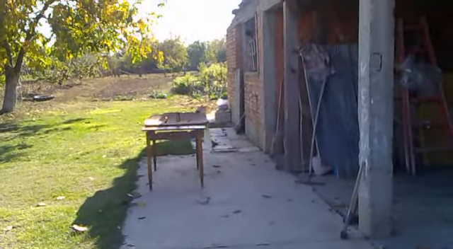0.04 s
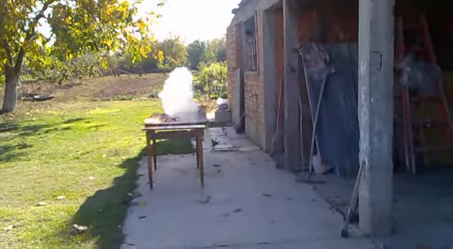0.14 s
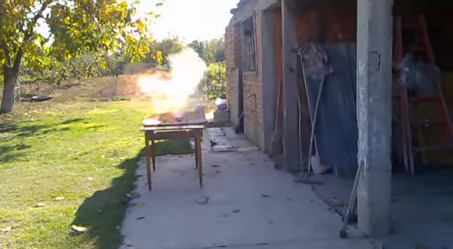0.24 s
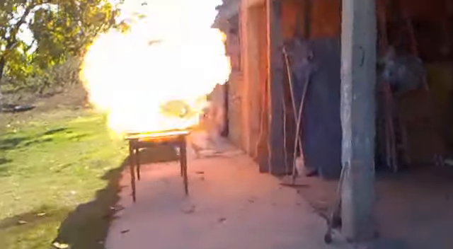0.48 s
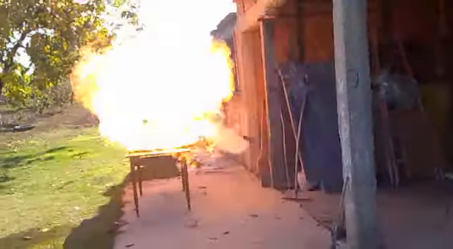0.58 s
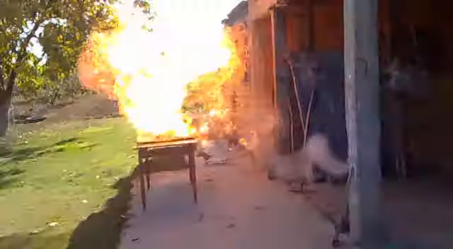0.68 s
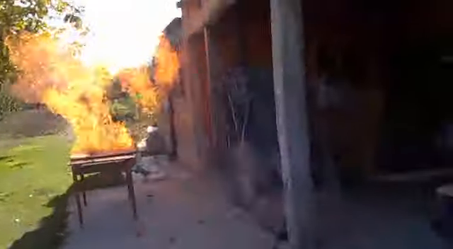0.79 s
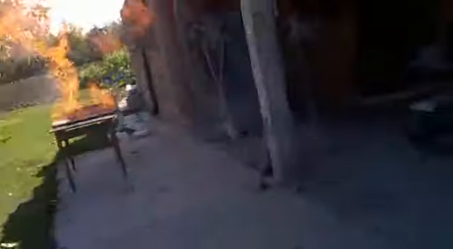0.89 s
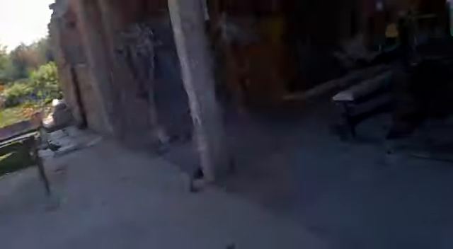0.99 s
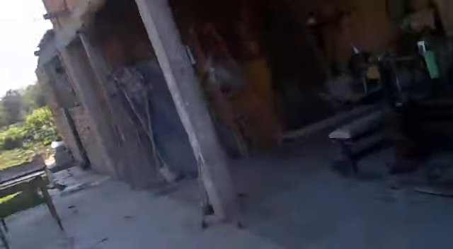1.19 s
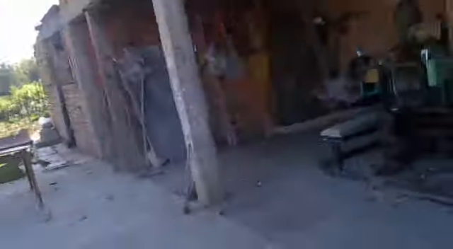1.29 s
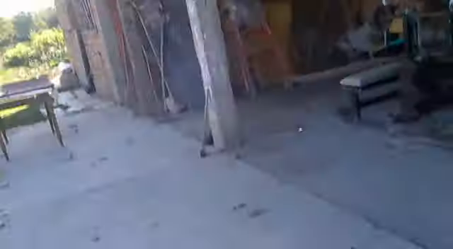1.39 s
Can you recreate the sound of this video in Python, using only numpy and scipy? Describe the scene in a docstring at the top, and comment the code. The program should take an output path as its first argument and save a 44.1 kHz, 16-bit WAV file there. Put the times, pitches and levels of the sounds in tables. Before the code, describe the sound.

A fireball erupts outdoors, starting with a hissing spit of fuel at about 0.2 seconds and a blast at 0.3. From 0.4 the flame roars, crackles and rumbles loudly with low thumps, flaring once more at 0.9 before dying down. At about 1.1 seconds a small, sharp knock echoes briefly around the yard, and soft microphone handling bumps follow until about 1.4.

```python
"""Pressurised fuel bursts into a fireball on a table outdoors, beside a shed.
After a faint tick, fuel spits out in a hissing jet and a second blast follows. The turbulent flame
roars, crackles and rumbles, with gliding resonances, brief rings and low thumps, then flares once more.
As it dies, something knocks, the yard echoes, and the moving microphone picks up soft thumps."""
import sys
import numpy as np
from scipy import signal
from scipy.fft import rfft, irfft
from scipy.io import wavfile
from scipy.ndimage import uniform_filter1d

SR = 44100
rng = np.random.default_rng(int(sys.argv[2]) if len(sys.argv) > 2 else 0)


def bounce(signal):
    """Save signal as a 16-bit WAV file at the path given by the first command-line argument."""
    frames = np.transpose(np.atleast_2d(signal))
    limited = np.clip(frames, -1, 1)
    pcm = np.round(limited * 32767).astype(np.int16)
    wavfile.write(sys.argv[1], SR, pcm)


N = 63945
T = np.arange(N) / SR
BIN_HZ = np.arange(N // 2 + 1) * SR / N


def from_db(db):
    """Decibels to gain."""
    return 10 ** (np.asarray(db) / 20)


def unit_rms(x):
    """Scale to unit power."""
    return x / np.sqrt(np.mean(x ** 2) + 1e-20)


def gain_curve(rows):
    """Gain along (time_s, level_db) points; silent before the first."""
    time_s, level_db = np.transpose(rows)
    return from_db(np.interp(T, time_s, level_db, left=-120))


def envelope(start_s, attack_s, hold_s, fall_db_per_s):
    """Linear rise, hold, exponential fall."""
    rise = np.clip((T - start_s) / attack_s, 0, 1)
    return rise * from_db(-fall_db_per_s * np.maximum(T - start_s - attack_s - hold_s, 0))


def at_hz(rows, hz, column=1):
    """Interpolate a table column over log frequency."""
    rows = np.array(rows)
    return np.interp(np.log(hz + 1), np.log(rows[:, 0]), rows[:, column])


def colour(x, spectrum):
    """Filter by (freq_hz, gain_db) points, rolled off past both ends; unit power."""
    low_skirt = np.minimum(BIN_HZ / spectrum[0][0], 1) ** 2
    high_skirt = np.minimum(spectrum[-1][0] / (BIN_HZ + 1), 1) ** 2
    return unit_rms(irfft(rfft(x) * from_db(at_hz(spectrum, BIN_HZ)) * low_skirt * high_skirt, N))


def steady(x, samples):
    """Level the power over a sliding window."""
    power = uniform_filter1d(uniform_filter1d(x * x, samples), samples)
    return x / np.sqrt(power + 1e-12)


def drift(cutoff_hz):
    """Low-passed noise, unit power."""
    lowpass = signal.butter(2, cutoff_hz, fs=SR, output="sos")
    return unit_rms(signal.sosfilt(lowpass, rng.standard_normal(N)))


def damped_sine(start_s, pitch_hz, t60_s):
    """One struck mode."""
    age_s = np.maximum(T - start_s, 0)
    return np.sin(2 * np.pi * pitch_hz * age_s) * np.exp(-np.log(1000) * age_s / t60_s)


# Flame band levels: time_s, level_db
RUMBLE_LEVEL = [(.22, -41), (.39, -43), (.43, -11.5), (.5, -17.5), (.56, -22.5), (.64, -21.5),
                (.685, -18.5), (.74, -16.5), (.78, -13.5), (.85, -10.5), (.92, -22.5), (1.03, -31),
                (1.12, -43), (1.2, -43.5), (1.27, -36), (1.32, -49), (1.45, -56)]
ROAR_LEVEL = [(.398, -41), (.422, -16), (.47, -13.5), (.51, -22), (.56, -19.5), (.62, -23), (.68, -22.5),
              (.73, -20), (.78, -15.5), (.84, -21), (.89, -21.5), (.95, -28.5), (1.03, -35.5), (1.1, -41.5),
              (1.25, -46), (1.45, -58)]
RASP_LEVEL = [(.38, -48), (.42, -26.5), (.56, -21.5), (.578, -14.5), (.615, -17.5), (.64, -20.5),
              (.71, -22.5), (.77, -27), (.89, -27), (.94, -38), (.99, -33), (1.08, -35), (1.25, -68)]
HISS_LEVEL = [(.36, -29.5), (.423, -26.5), (.434, -35), (.48, -30), (.56, -29), (.6, -23.5), (.66, -28),
              (.705, -25), (.79, -30.5), (.84, -26), (.88, -31), (1.03, -33), (1.08, -44), (1.16, -57),
              (1.225, -45.5), (1.31, -66)]
# Flame band spectra: freq_hz, gain_db
RUMBLE_SPECTRUM = [(18, -3), (32, -12), (48, 9.5), (68, -6.5), (92, 6.5), (122, -14.5), (152, -1.5),
                   (210, -9), (400, -19)]
ROAR_SPECTRUM = [(90, -1.5), (155, 4), (240, 1.5), (320, 4.5), (430, -1), (580, -9.5), (800, -5.5),
                 (1500, -15)]
RASP_SPECTRUM = [(700, -5), (1150, -4), (1500, -4.5), (1800, 3), (2250, -3), (2850, -3), (3250, -5.5),
                 (4200, -8), (6500, -37)]


def fireball():
    """Burning fuel: low rumble under turbulent roar and rasp, hiss on top."""
    rumble = gain_curve(RUMBLE_LEVEL) * steady(colour(rng.standard_normal(N), RUMBLE_SPECTRUM), 1500)
    roar = gain_curve(ROAR_LEVEL) * turbulence(ROAR_SPECTRUM)
    rasp = gain_curve(RASP_LEVEL) * turbulence(RASP_SPECTRUM)
    return rumble + roar + rasp + gain_curve(HISS_LEVEL) * hiss()


# Flame hiss: freq_hz, gain_db
HISS_SPECTRUM = [(2800, 3), (4300, -2), (6000, 2), (8000, -1.5), (10500, -0.5), (13000, -6), (16000, -15)]


def hiss():
    """Smooth, bright rush without shocks or flutter."""
    return steady(colour(rng.standard_normal(N), HISS_SPECTRUM), samples=200)


def turbulence(spectrum, shocks_per_s=1900, shock_share=0.33, spread_db=2.5, flutter_db=1.35):
    """Rushing gas: noise plus dense small shocks, with a fast flutter."""
    impulses = (rng.random(N) < shocks_per_s / SR) * rng.choice([-1, 1], N)
    shocks = impulses * from_db(spread_db * np.minimum(rng.exponential(1, N), 4))
    gas = np.sqrt(shock_share) * unit_rms(shocks) + np.sqrt(1 - shock_share) * rng.standard_normal(N)
    flutter = from_db(flutter_db * drift(cutoff_hz=102))
    return steady(colour(shed_reflections(gas), spectrum), samples=600) * flutter


# Escaping fuel: freq_hz, gain_db
JET_SPECTRUM = [(170, -4.5), (340, 5), (560, 1), (1400, 1.5), (2000, 5), (3000, -8.5), (4200, -14.5),
                (6200, -9), (8000, -16), (10000, -23), (13000, -26), (16000, -39)]
BLAST_SPECTRUM = [(60, -42), (170, -3.5), (330, -0.5), (520, -5), (800, 2), (1400, -0.5), (2000, 0.5),
                  (2900, -5.5), (4200, -11.5), (7000, -18), (11000, -19.5), (16000, -33)]
JET_S, BLAST_S = 0.2255, 0.2952


def burst():
    """Pressure release: a bright jet, then a fuller second blast."""
    jet = envelope(JET_S, attack_s=0.008, hold_s=0.025, fall_db_per_s=115) * limiter_dip()
    blast = envelope(BLAST_S, attack_s=0.00043, hold_s=0.069, fall_db_per_s=128)
    return from_db(-12) * (jet * turbulence(JET_SPECTRUM) + blast * turbulence(BLAST_SPECTRUM))


def limiter_dip(depth_db=-19, width_s=0.0024):
    """The level ducks briefly, as from a limiter, at the second blast's onset."""
    return from_db(depth_db * np.exp(-((T - BLAST_S) / width_s) ** 2))


# Fuel spit: freq_hz, gain_db
SPIT_SPECTRUM = [(3500, -31), (6300, -8), (8000, -1), (10500, 1.5), (13000, -14)]


def tick_and_spit():
    """A faint tick, then the bright spit of escaping fuel."""
    tick = envelope(start_s=0.1445, attack_s=0.001, hold_s=0.001, fall_db_per_s=1500) * hiss()
    spit = envelope(JET_S, attack_s=0.006, hold_s=0, fall_db_per_s=206) * turbulence(SPIT_SPECTRUM)
    return from_db(-57.5) * tick + from_db(-19) * spit * limiter_dip()


# Last flare: freq_hz, gain_db
FLARE_SPECTRUM = [(500, -1.5), (850, -3), (1200, 3.5), (1550, -3), (2050, -0.5), (2800, -4.5),
                  (4200, -16.5), (6200, -22), (9000, -42)]


def flare():
    """One last rush before the flame collapses."""
    shape = envelope(start_s=0.893, attack_s=0.014, hold_s=0.027, fall_db_per_s=161)
    return from_db(-19.5) * shape * turbulence(FLARE_SPECTRUM)


# Flame resonances: time_s, pitch_hz, level_db
HOLLOW_GLIDE = [(.41, 760, -28.5), (.475, 870, -18), (.51, 900, -24), (.55, 781, -19), (.61, 850, -32),
                (.675, 820, -15), (.71, 920, -20), (.78, 850, -26)]
WHISTLE_GLIDE = [(.42, 2623, -29), (.455, 2657, -22.5), (.51, 2783, -26.5), (.56, 2726, -26),
                 (.597, 2735, -17), (.63, 2603, -22), (.695, 2490, -27), (.714, 2514, -21.5)]


def resonance(glide, width_hz, fall_db_per_s=500):
    """The flame sings: narrow noise on a gliding pitch, dying after the last point."""
    time_s, pitch_hz, level_db = np.transpose(glide)
    phase = 2 * np.pi * np.cumsum(np.interp(T, time_s, pitch_hz)) / SR
    band = drift(width_hz / 2) * np.cos(phase) + drift(width_hz / 2) * np.sin(phase)
    release_db = fall_db_per_s * np.maximum(T - time_s[-1], 0)
    return from_db(np.interp(T, time_s, level_db, left=-120) - release_db) * steady(band, samples=1000)


# Dull pops: centre_s, level_db
POPS = [(0.545, -11), (0.984, -22), (1.257, -29.5)]
# Pop spectrum: freq_hz, gain_db
POP_SPECTRUM = [(150, -2), (450, -4), (900, -12.5)]


def pops(width_s=0.0048):
    """Dull pops: two in the flame's roar, then a soft microphone-handling bump."""
    pulses = sum(from_db(db) * np.exp(-((T - centre_s) / width_s) ** 2) for centre_s, db in POPS)
    return pulses * steady(turbulence(POP_SPECTRUM), samples=150)


# Rings in the blaze: start_s, pitch_hz, level_db, attack_s, t60_s
RINGS = [(.2955, 1630, -4, 0.00073, 0.0067), (0.566, 1720, -6, 0.0075, 0.032),
         (0.9033, 2015, -6.5, 0.0013, 0.015)]


def rings(wander=0.005):
    """Brief ringing tones of unsteady pitch."""
    out = np.zeros(N)
    for start_s, pitch_hz, level_db, attack_s, t60_s in RINGS:
        phase = 2 * np.pi * np.cumsum(pitch_hz * (1 + wander * drift(cutoff_hz=240))) / SR
        shape = envelope(start_s, attack_s, hold_s=0, fall_db_per_s=60 / t60_s)
        out += from_db(level_db) * shape * np.sin(phase)
    return out


# Low thumps: start_s, pitch_hz, level_db, t60_s
THUMPS = [(.228, 117, -25, 0.085), (0.298, 103, -27, 0.07), (0.68, 111, -7.5, 0.14),
          (1.15, 62.4, -21.5, 0.068), (1.235, 82, -18, 0.029), (1.422, 44.4, -22.5, 0.075)]


def thumps():
    """Pushes of air from the flame, later microphone handling."""
    return sum(from_db(db) * damped_sine(start_s, hz, t60_s) for start_s, hz, db, t60_s in THUMPS)


# Struck object: pitch_hz, gain_db, t60_s
KNOCK_MODES = [(950, -9.5, 0.051), (1800, -16, 0.016), (2880, -9, 0.019), (3760, 0, 0.022),
               (5650, -2.5, 0.013), (8560, -4, 0.011)]
# Impact crack: freq_hz, gain_db
CRACK_SPECTRUM = [(300, -5), (1000, -9.5), (2200, -1), (4000, -3), (6500, -20), (9000, -8), (11000, -23)]
KNOCK_S = 1.089


def knock():
    """A struck object rings; its short crack scatters off nearby surfaces."""
    body = sum(from_db(db) * damped_sine(KNOCK_S, hz, t60_s) for hz, db, t60_s in KNOCK_MODES)
    crack = from_db(-18.5) * envelope(KNOCK_S, attack_s=0.00062, hold_s=0.0012, fall_db_per_s=2500)
    scatter = from_db(-29) * envelope(KNOCK_S, attack_s=0.0025, hold_s=0.012, fall_db_per_s=270)
    return from_db(-18.5) * body + np.hypot(crack, scatter) * turbulence(CRACK_SPECTRUM)


# Yard reverberation: freq_hz, gain_db, fall_db_per_s
YARD_BANDS = [(328, -15.5, 70), (680, -18, 67), (970, -11, 74), (1370, -1.5, 79), (1668, -9.5, 92),
              (1900, -2.5, 108), (2900, -10.5, 99), (4570, -24.5, 109), (7360, -28.5, 121),
              (16000, -42, 213)]


def yard_reverb():
    """Diffuse reflections swell after the knock and die, treble first."""
    noise_bins = rfft(turbulence(YARD_BANDS))
    edges_hz = np.geomspace(100, 20000, 17)
    out = np.zeros(N)
    for low_hz, high_hz in zip(edges_hz, edges_hz[1:]):
        band = irfft(noise_bins * (BIN_HZ >= low_hz) * (BIN_HZ < high_hz), N)
        fall = at_hz(YARD_BANDS, np.sqrt(low_hz * high_hz), column=2)
        out += band * envelope(KNOCK_S, attack_s=0.017, hold_s=0.031, fall_db_per_s=fall)
    return from_db(-22.5) * out


# Knock echoes: freq_hz, gain_db
ECHO_SPECTRUM = [(900, -10), (1400, -4), (2000, 7), (2700, 6.5), (4500, -15), (9000, -27)]


def knock_echoes(slap_delay_s=0.0275, far_delay_s=0.18):
    """Two noise bursts: a slap off a wall, then a soft, slow far echo."""
    far = envelope(KNOCK_S + far_delay_s, attack_s=0.037, hold_s=0.09, fall_db_per_s=370)
    far *= turbulence(ECHO_SPECTRUM)
    slap = envelope(KNOCK_S + slap_delay_s, attack_s=0.00086, hold_s=0, fall_db_per_s=2200)
    slap *= steady(turbulence(ECHO_SPECTRUM), samples=100)
    return from_db(-20) * slap + from_db(-43) * far


# Shed reflections: delay_s, gain_db
SHED_TAPS = [(0.0118, -18), (0.0201, -18.5)]


def shed_reflections(x):
    """Early reflections comb-filter a steady sound."""
    reflected = sum(from_db(db) * np.exp(-2j * np.pi * BIN_HZ * delay_s) for delay_s, db in SHED_TAPS)
    return irfft(rfft(x) * (1 + reflected), N)


# Outdoor background: freq_hz, gain_db
AIR_SPECTRUM = [(20, -2), (60, 11.5), (120, -6.5), (300, -10.5), (650, -18), (1300, -14.5), (2400, -22.5),
                (4000, -33.5), (8000, -37.5), (16000, -39)]


def outdoor_air():
    """Faint, steady, bass-heavy noise."""
    return from_db(-46.5) * colour(rng.standard_normal(N), AIR_SPECTRUM)


def scene():
    """Mono mix: burst, flame and knock over the background."""
    mix = outdoor_air() + tick_and_spit() + burst() + fireball()
    mix += resonance(HOLLOW_GLIDE, width_hz=290) + resonance(WHISTLE_GLIDE, width_hz=330)
    mix += pops() + flare() + rings() + thumps()
    mix += knock() + yard_reverb() + knock_echoes()
    return mix[None]


def record(dry, clip_level=0.71, cutoff_hz=15900):
    """Soft clip, then a steep low-pass."""
    lowpass = signal.ellip(12, 0.1, 80, cutoff_hz, fs=SR, output="sos")
    return signal.sosfilt(lowpass, clip_level * np.tanh(dry / clip_level))


dry = scene()
out = record(dry)
bounce(out)
```